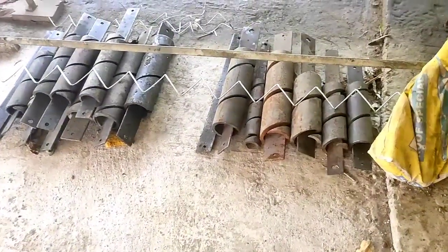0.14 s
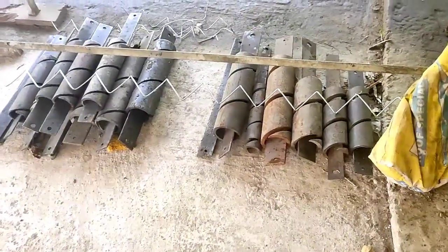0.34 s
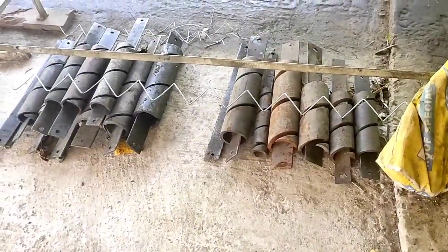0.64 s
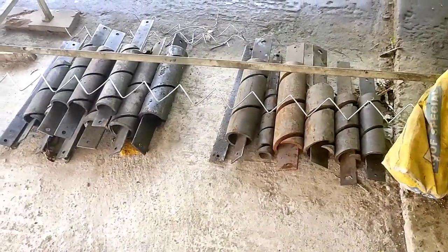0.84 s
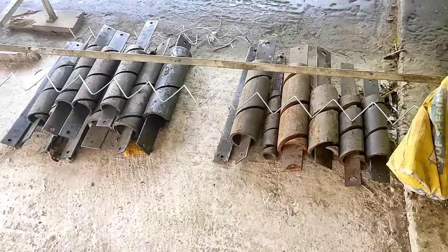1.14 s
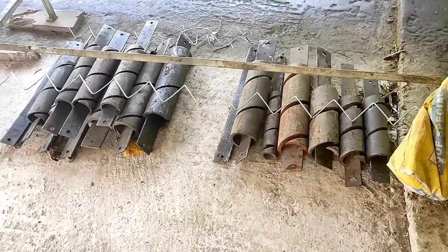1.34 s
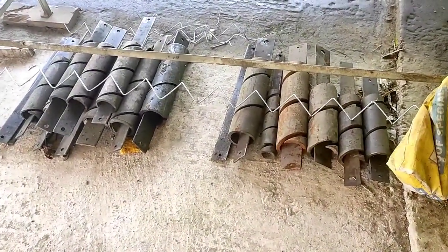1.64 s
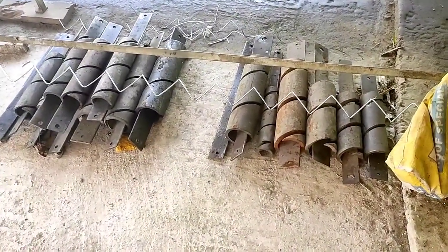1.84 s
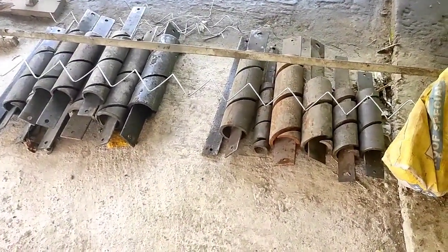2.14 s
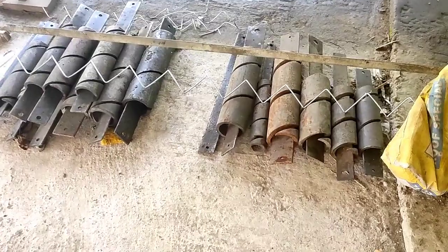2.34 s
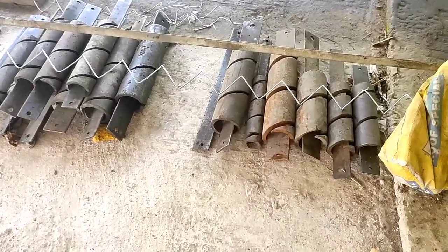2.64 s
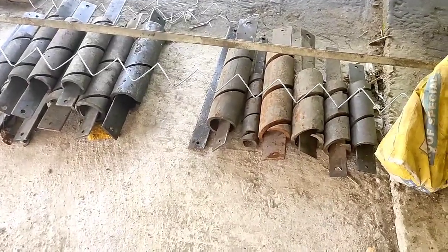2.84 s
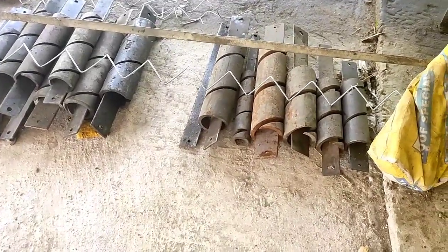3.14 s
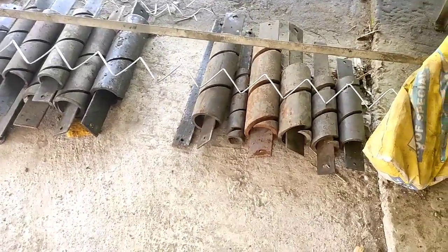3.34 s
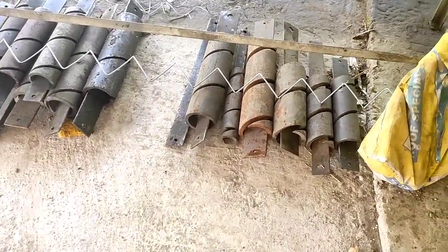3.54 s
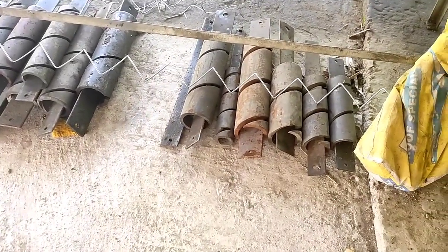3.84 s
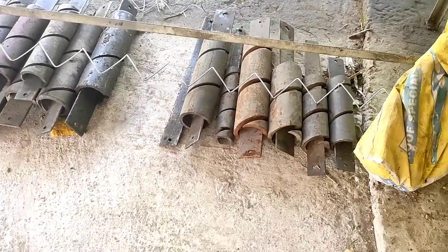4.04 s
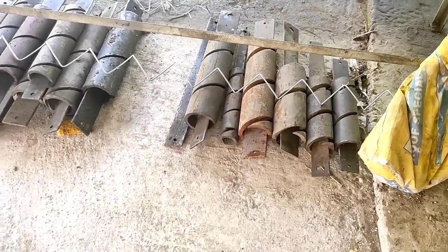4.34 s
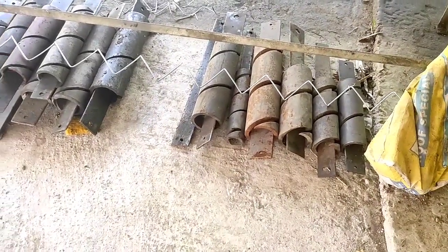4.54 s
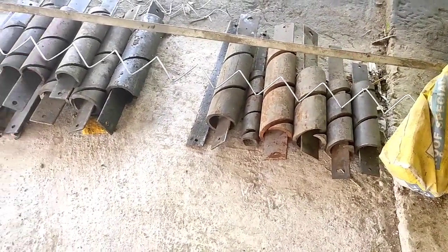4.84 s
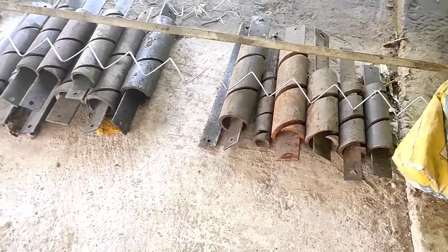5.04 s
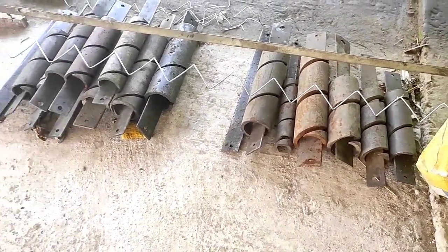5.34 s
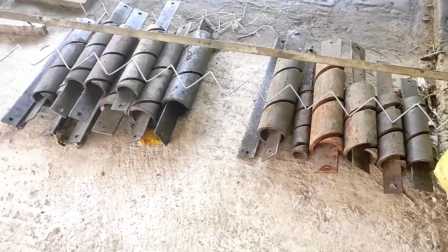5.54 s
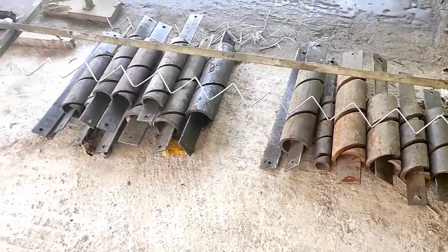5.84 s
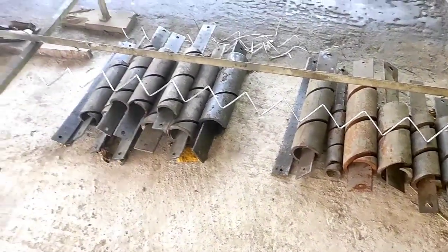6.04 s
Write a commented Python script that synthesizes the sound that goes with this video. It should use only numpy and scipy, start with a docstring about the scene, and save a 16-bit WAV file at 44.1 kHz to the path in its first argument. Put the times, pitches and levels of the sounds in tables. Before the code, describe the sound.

Quiet workshop idle, one cutter snap and sliding wire, then at two seconds a fence-weaving machine starts abruptly into dense, throbbing metallic rattle.

```python
"""A chain-link fence machine at work, close by, from beside its forming spirals in a hard-walled workshop.
At rest its motor idles, slack wire scrapes, mesh rustles and the cutter clacks; then the clutch takes hold.
Eight shaft turns a second drive harmonics of hum and random blows on frame and guides, each ringing
through its own spectrum. A plate sings, loose parts clang, the wire spiral rattles and whips in bursts.
A two-port microphone takes direct sound, early reflections and a diffuse tail."""
import sys
import numpy as np
from scipy import signal
from scipy.fft import rfft, irfft
from scipy.io import wavfile
from scipy.ndimage import uniform_filter1d, map_coordinates

SR = 44100
rng = np.random.default_rng(int(sys.argv[2]) if len(sys.argv) > 2 else 0)


def bounce(signal):
    """Save signal as a 16-bit WAV file at the path given by the first command-line argument."""
    frames = np.transpose(np.atleast_2d(signal))
    limited = np.clip(frames, -1, 1)
    pcm = np.round(limited * 32767).astype(np.int16)
    wavfile.write(sys.argv[1], SR, pcm)


N = 272979
T = np.arange(N) / SR  # time [s]

# Microphone: spacing of its ports, arrival lag at the left one [samples], upper limit
PORT_GAP_M, PORT_LAG, TOP_HZ = 0.18, 19, 14400

# Drive: shaft rate; the clutch starts to engage, its run-up, and the moment it takes hold
SHAFT_HZ = 8.015
ENGAGE_S, RUN_UP_S, BITE_S = 2.062, 0.055, 2.115
# Force through one turn, with two main strokes; each part takes its own share of the dB:
# (share of the turn [0-1], relative force [dB])
STROKE_FORCE = [(0, 2), (.15, -2), (.27, 3), (.42, 4), (.56, 1.5), (.72, -4), (.84, 9.5), (.95, 5.5)]
# Hum of the loaded drive: (multiple of the shaft rate, relative rms level [dB])
HUM_HARMONICS = [(1, -62), (3, -69), (4, -66), (6, -52.5), (13, -58), (15, -54), (16, -48), (18, -39.5),
                 (19, -41), (20, -48), (22, -40.5), (25, -39.5), (26, -32), (28, -37), (29, -37),
                 (30, -38.5), (31, -36.5), (38, -37.5), (42, -44), (50, -36.5), (52, -42), (54, -40.5),
                 (60, -48.5), (70, -49), (71, -39), (72, -40), (73, -42), (75, -34.5), (81, -41),
                 (83, -45.5), (85, -40)]
HUM_WAVER_DB = 2.14  # each harmonic's unsteadiness

# Spectrum of the steel frame: (frequency [Hz], relative level [dB])
FRAME_COLOUR = [(20, -16), (60, -26.5), (100, -18), (140, -4), (220, -9.5), (300, -2.5), (365, -7.5),
                (450, -8), (680, -2.5), (900, -11), (1400, -23), (3000, -48.5)]
# Resonances of the frame: (frequency [Hz], width [Hz], lift [dB])
FRAME_MODES = [(143.5, 13, -3.5), (204.3, 13, 11), (225, 16, 7.5), (418.3, 13, 7.5), (482, 18, 9.5),
               (568, 8.8, 10), (586, 46, 1), (650, 43, 3)]
# Borders between the panels' ranges: (frequency [Hz], ...)
FRAME_BANDS_HZ = (174, 277, 364, 536, 622)
# Heavy knocks, each booming one panel: (time [s], pitch [Hz], level [dB])
PANEL_KNOCKS = [(2.14, 150, -24.5), (2.222, 579, -18.5), (2.470, 581, -19.5), (2.514, 209.6, -20),
                (2.603, 435, -24), (3.066, 418, -20.5), (3.11, 248, -20), (3.126, 664, -18),
                (3.145, 420, -21), (3.476, 238, -21), (3.54, 565, -17), (3.781, 589, -17.5),
                (3.962, 575, -15), (4.011, 219, -22), (4.091, 213.4, -17), (4.214, 235.6, -21.5),
                (4.594, 255, -21), (4.718, 246, -21), (4.771, 478, -26), (4.787, 226, -18),
                (5.024, 664, -17.5), (5.212, 580, -18), (5.346, 205, -24), (5.51, 214, -18),
                (5.596, 248, -19), (5.718, 224, -21), (5.768, 593, -17), (5.847, 243, -18),
                (5.985, 473, -18)]
KNOCK_T60_S, KNOCK_OVERTONE, KNOCK_OVERTONE_DB = 0.21, 2.1, -5  # overtone: pitch ratio, relative level
CONTACT_S = 0.009  # how long a blow takes to set steel ringing

# Spectrum of the sheet-metal guides: (frequency [Hz], relative level [dB])
GUIDE_COLOUR = [(300, -12.5), (700, -1), (1000, -1.5), (1420, -4.5), (1700, 0), (2400, -4), (2800, -6),
                (3500, -11), (5500, -15.5), (14000, -31.5)]
# Resonances of the guides: (frequency [Hz], width [Hz], lift [dB])
GUIDE_MODES = [(1263, 82, 6.4), (1750, 42, 3.3), (2246, 35, 4.9), (2368, 49, 6), (2670, 81, 2.5),
               (3090, 76, 5.2), (3700, 31, 3.4)]
# Borders between ranges where the guides' colour shifts: (frequency [Hz], ...)
GUIDE_BANDS_HZ = (990, 1510, 2050, 2560)
GUIDE_WAVER_DB = 1.0  # how far it shifts
# A guide plate singing under the rubbing wire; positive pan is to the left
SING_HZ, SING_Q, SING_DB, SING_PAN_DB = 1243, 62, -34.5, -0.5

# Force on frame and guides in steady running (relative dB), and how far it wavers
FRAME_DB, GUIDES_DB, WAVER_DB = -26.5, -27.5, 0.39
# Taking up the load: extra force, and how fast it settles once the clutch holds
SURGE_DB, SURGE_S = 4.5, 0.089
# The wire snags or slips, and the drive labours or eases for a moment:
# (time of the peak [s], frame lift [dB], guides lift [dB])
SNAGS = [(2.49, 2, 3), (2.60, 3, -1), (3.06, 0.5, 2), (3.13, 4, -2), (3.29, 2, -4.5), (3.51, 2, 2),
         (3.78, 2.5, -4), (3.97, 2, 4), (4.10, -1, -0.5), (4.2, -1.5, 1.5), (4.48, 4.5, 1), (4.58, -3, 0),
         (4.8, 3.5, -2), (4.91, -1, 3), (5.2, 3.5, 1), (5.58, 0, 0), (5.69, -5, -1.5), (5.85, 3, 2)]
SNAG_S = 0.051  # half width of the swell

# Loose spirals clanging: (time [s], pitch [Hz], level [dB])
SPIRAL_CLANGS = [(2.068, 850, -31.5), (2.11, 1740, -23), (2.191, 1710, -29), (2.295, 1700, -26),
                 (2.325, 1730, -23), (2.411, 1187, -28), (2.435, 1730, -29), (2.54, 1184, -24),
                 (2.571, 1708, -23), (2.925, 1755, -25), (2.99, 1243, -23.5), (3.02, 1840, -31),
                 (3.04, 2120, -31), (3.065, 2330, -24), (3.227, 1243, -25), (4.168, 1767, -22),
                 (4.28, 2360, -23), (4.369, 1710, -27), (4.415, 1841, -25), (4.534, 1245, -27),
                 (4.54, 2380, -27), (4.56, 1960, -23), (4.575, 1606, -23.5), (4.7, 2310, -27),
                 (4.815, 2210, -31), (4.981, 1790, -31), (5.07, 1740, -30), (5.16, 1266, -26),
                 (5.564, 1787, -27), (5.995, 1757, -25)]
CLANG_Q, CLANG_ATTACK_S, CLANG_DECAY_S = 49, 0.0033, 0.05

# Spectrum of the thin wire: (frequency [Hz], relative level [dB])
WIRE_COLOUR = [(200, -15), (800, -2.5), (1800, 0.5), (3200, 3), (4500, 1.5), (5800, -0.5), (7100, 3),
               (8700, -1.5), (11000, -2), (14000, -4)]
# Borders between ranges where the wire's colour shifts: (frequency [Hz], ...)
WIRE_BANDS_HZ = (3000, 5560, 8600, 11300)
WIRE_WAVER_DB = 0.53  # how far it shifts
SIZZLE_DB, WIRE_THROB = -40, 0.64  # underlying ticking (relative); share of the stroke's dB reaching the wire
# Bursts of wire shaking against mesh and spirals: (time [s], relative level [dB], length [s])
SHAKES = [(2.452, -29.5, 0.029), (2.622, -31, 0.082), (2.82, -32, 0.11), (2.96, -31.5, 0.19),
          (3.201, -26.5, 0.034), (3.327, -29.5, 0.1), (3.454, -27.5, 0.04), (3.626, -27, 0.06),
          (3.823, -26, 0.069), (4.01, -26.5, 0.061), (4.135, -25, 0.028), (4.306, -26, 0.12),
          (4.408, -24, 0.027), (4.527, -23, 0.062), (4.649, -25, 0.012), (4.764, -24, 0.078),
          (4.979, -25.5, 0.1), (5.12, -28, 0.065), (5.268, -25, 0.078), (5.383, -28.5, 0.057),
          (5.509, -24, 0.07), (5.68, -25.5, 0.14), (5.894, -26, 0.09), (5.972, -27.5, 0.08),
          (6.07, -27, 0.11)]
SHAKE_ATTACK_S, SHAKE_RELEASE_S = 0.008, 0.022
# Each burst also shakes guides and frame (dB relative to the burst); slack wire passes on a limited force
SHAKE_TO_GUIDES_DB, SHAKE_TO_FRAME_DB, SHAKE_LIMIT_DB = 2, -11, -23
# The wire's end whipping the steel: (time [s], centre of the ring [Hz], level [dB], decay [s])
WIRE_WHIPS = [(2.648, 6900, -32, .04), (3.213, 12200, -33, .03), (3.505, 11800, -34, .03),
              (3.66, 11000, -32, 0.036), (3.838, 5350, -33, .025), (3.965, 12500, -33, .03),
              (4.146, 4190, -31, .02), (4.403, 13400, -27, 0.04), (4.532, 10800, -33, .025),
              (4.585, 12000, -26, 0.033), (4.772, 12900, -24, 0.02), (4.845, 12000, -27, 0.033),
              (5.024, 7030, -30, 0.031), (5.03, 11000, -30, .03), (5.29, 7100, -31, .03),
              (5.526, 8700, -29, .025), (5.54, 12500, -27, .03), (6.04, 11700, -38, .035)]
WHIP_Q = 5.1

# Clacks of the cutter and the clutch: (time [s], relative level [dB], chatter decay [s])
STEEL_CLACKS = [(1.398, -23, 0.027), (1.422, -28.5, 0.02), (1.449, -30.5, 0.045), (1.512, -37, 0.033),
                (1.572, -42, 0.028), (1.632, -46, .025), (2.064, -25, 0.062), (2.093, -21, 0.021)]
# Spectrum of the clacks: (frequency [Hz], relative level [dB])
CLACK_COLOUR = [(50, -29), (110, -9), (150, -4.5), (210, -4.5), (330, -15), (440, -9), (760, -7),
                (1350, -4), (1560, -3.5), (2100, -6), (2700, -6), (4000, -8), (14000, -16.5)]
# Ring of the cutter's steel: (frequency [Hz], width [Hz], lift [dB])
CLACK_MODES = [(1060, 54, 2), (1580, 36, 7), (1630, 25, 8), (1860, 25, 8), (1990, 25, 9), (2400, 30, 7),
               (3050, 32, 9), (3240, 25, 8), (3460, 27, 0)]
# Ring of the clutch housing as the drive takes hold: (frequency [Hz], starting rms level [dB], t60 [s])
HOUSING_MODES = [(573, -13.5, 0.31), (598, -23, 0.25), (708, -19, 0.24), (873, -20.5, 0.26),
                 (1270, -28, 0.35), (1790, -30, 0.18), (2210, -25, 0.38), (2400, -30, 0.25),
                 (2821, -31, .3), (3070, -31, .18)]

# Wire sliding through the guides while the drive rests:
# (time [s], relative level [dB], length [s], fade [s], metallic ring [0-1])
SCRAPES = [(-.02, -46, 0.21, .085, 0.5), (0.436, -55, 0.043, 0.055, 0), (0.66, -54, 0.35, .06, 0),
           (1.092, -45.5, 0.069, 0.076, 0.6), (1.284, -48, 0.11, .06, 0.1),
           (1.544, -37.5, 0.036, 0.19, 0.8), (1.698, -44, 0.11, .06, 0.66)]
SCRAPE_ATTACK_S = 0.01
# Spectrum of the scraping: (frequency [Hz], relative level [dB])
SLIDE_COLOUR = [(400, 3.5), (1500, -11), (3200, 3), (5500, 0), (7000, 6.5), (9000, 4), (12000, 4.5),
                (14500, -1.5)]

# Nudges of the hanging mesh while the drive rests: (time [s], level [dB])
NUDGES = [(-.09, -46), (.67, -47.5), (1.48, -38.5), (1.85, -47)]
NUDGE_ATTACK_S, NUDGE_HOLD_S, NUDGE_DECAY_S = 0.039, 0.077, 0.093
MESH_REST_DB = -63  # its faint stirring in between
# Spectrum of the mesh: (frequency [Hz], relative level [dB])
MESH_COLOUR = [(250, -10.5), (700, 3), (1000, 0.5), (1400, -0.5), (2300, -3), (3300, -6.5), (5500, -13),
               (14000, -45)]

# A steel part left ringing: (frequency [Hz], starting rms level [dB], t60 [s])
PING_MODES = [(2670, -47, 0.33), (2745, -51, 0.25)]

# Spectrum of the idling motor: (frequency [Hz], relative level [dB])
IDLE_COLOUR = [(12, -45), (32, 1), (130, -1.5), (250, -5), (350, -9), (490, -18), (620, -9.5), (820, -11.5),
               (1150, -10), (1400, -13), (2060, -13), (3860, -22), (8000, -24), (14000, -31)]
# Resonance of the motor: (frequency [Hz], width [Hz], lift [dB])
IDLE_MODE = [(623, 25, 9.4)]
IDLE_DB = -48.5  # rumble, about which it wavers
# Steady lines of the motor: (frequency [Hz], rms level about which it wavers [dB])
IDLE_LINES = [(100, -62.5), (178, -61), (209, -61), (399, -72)]


def hum(turns, engaged, stroke_db):
    """Shaft harmonics, each wavering as the load shifts; they throb with the strokes."""
    out = np.zeros((2, N))
    # the left port lags by half the direct sound's delay, so it hears an earlier turn
    ports = turns - np.array([[PORT_LAG / 2], [0]]) * SHAFT_HZ / SR
    for order, db in HUM_HARMONICS:
        phase = 2 * np.pi * (round(order) * ports + rng.random()) + 0.19 * walk(6)
        out += undb(db + HUM_WAVER_DB * walk(7)) * np.sqrt(2) * np.sin(phase)
    return out * engaged * undb(-2.5 + 0.44 * stroke_db)


def frame(force):
    """Play in the bearings knocks the frame, hardest on each stroke; its panels flex and boom unevenly."""
    jolts = impacts(900, 2.05) * force * load(FRAME_DB, SHAKE_TO_FRAME_DB, column=1)
    boom = workshop(jolts, FRAME_COLOUR, FRAME_MODES, wet_db=-5.0, t60=0.3, early_db=-22, pan_db=1.6)
    flexing = flex(undb(-1.15) * boom, drift_ms=.2, rate=8)
    return shimmer(flexing, FRAME_BANDS_HZ, .9, rate=14)


def knocks():
    """A blow makes a panel boom with one inharmonic overtone."""
    out = np.zeros((2, N))
    for s, hz, db in PANEL_KNOCKS:
        boom = (hz, db, KNOCK_T60_S)
        overtone = (hz * KNOCK_OVERTONE, db + KNOCK_OVERTONE_DB, KNOCK_T60_S / 2)
        out += struck(s, [boom, overtone])
    return out


def guides(force):
    """The spinning wire beats its guides, which flex as they ring."""
    beats = impacts(650, 3.0) * force * load(GUIDES_DB, SHAKE_TO_GUIDES_DB, column=2)
    clatter = workshop(beats, GUIDE_COLOUR, GUIDE_MODES, wet_db=8.0, t60=0.74, early_db=2.0, pan_db=-2.5)
    return shimmer(flex(clatter, drift_ms=.35, rate=10), GUIDE_BANDS_HZ, GUIDE_WAVER_DB, rate=14)


def sing(force):
    """The wire rubs a guide plate into a rough note that wavers in pitch and strength."""
    note = unit(signal.lfilter(*signal.iirpeak(SING_HZ, SING_Q, SR), diffuse(N)))
    level = undb(SING_DB + 2 * walk(7))
    return flex(note, drift_ms=0.16, rate=12) * force * level * pan(SING_PAN_DB)


def clangs():
    """Each loose part chatters briefly against its neighbours and rings at its own pitch."""
    t = T[:SR // 2]
    chatter = np.clip(t / CLANG_ATTACK_S, 0, 1) * np.exp(-t / CLANG_DECAY_S)
    out = np.zeros((2, N))
    for s, hz, db in SPIRAL_CLANGS:
        add_burst(out, s, diffuse(len(t)) * chatter, chatter, hz, CLANG_Q, db)
    return out


def wire(force):
    """Bursts of tiny wire-on-wire ticks over an underlying sizzle, shifting in colour as the spiral turns."""
    ticks = impacts(2000, 5.8) * np.sqrt((undb(SIZZLE_DB) * force) ** 2 + shaking())
    rattle = workshop(ticks, WIRE_COLOUR, (), wet_db=12.5, t60=0.65, early_db=11.5, pan_db=-0.5)
    flexing = flex(undb(2.0) * rattle, drift_ms=.4, rate=9)
    return shimmer(flexing, WIRE_BANDS_HZ, WIRE_WAVER_DB, rate=16)


def whips():
    """The wire's end strikes a sharp spray of ticks, each with its own colour."""
    t = T[:SR // 4]
    out = np.zeros((2, N))
    for s, hz, db, decay in WIRE_WHIPS:
        fade = np.exp(-t / decay)
        ticks = diffuse(len(t)) * fade * undb(2.1 * walk(900, size=len(t)))
        add_burst(out, s, ticks, fade, hz, WHIP_Q, db)
    return out


def clacks():
    """Steel snaps shut and chatters to rest; the workshop rings on."""
    force = np.zeros(N)
    for s, db, decay in STEEL_CLACKS:
        force += undb(db) * (T >= s) * np.exp(-np.maximum(T - s, 0) / decay)
    blows = impacts(1400, 2.2) * force
    ringing = workshop(blows, CLACK_COLOUR, CLACK_MODES, wet_db=4.0, t60=0.27, early_db=-6.0, pan_db=-1.0)
    return undb(1.0) * ringing


def clutch_housing():
    """The housing's steel modes ring as the drive takes hold."""
    return struck(BITE_S, HOUSING_MODES)


def slide(round_trip_hz=236):
    """Scraping hiss runs to and fro in the wire and takes on a thin metallic ring."""
    pulls = np.array([undb(db) * stroke(s, SCRAPE_ATTACK_S, length, fade)
                      for s, db, length, fade, _ in SCRAPES])
    scrape = impacts(6000, 3.0) * pulls.max(axis=0) * undb(walk(24.5))
    # the strongest scrape sets how much comes back from each trip
    echo = np.clip(np.array(SCRAPES)[pulls.argmax(axis=0), 4], 0, .8)
    hiss = workshop(scrape, SLIDE_COLOUR, (), wet_db=7, t60=.12, early_db=0, pan_db=0)
    lag = int(SR / round_trip_hz)
    trips = sum(echo ** k * np.pad(hiss, ((0, 0), (k * lag, 0)))[:, :N] for k in range(5))
    return np.sqrt(1 - echo ** 2) * trips


def mesh():
    """While the drive rests the hanging mesh sways and rustles softly."""
    sway = undb(MESH_REST_DB) * np.ones(N)
    for s, db in NUDGES:
        sway += undb(db) * stroke(s, NUDGE_ATTACK_S, NUDGE_HOLD_S, NUDGE_DECAY_S)
    stir = impacts(900, 5.4) * sway * (T < ENGAGE_S)
    return workshop(stir, MESH_COLOUR, (), wet_db=-2.5, t60=0.77, early_db=-0.5, pan_db=-3.5)


def ping():
    """Two steel modes ring and die away at the opening."""
    return struck(0, PING_MODES)


def motor():
    """The motor idles throughout: soft rumble and a few lines that waver."""
    rumble = unit(np.array([ring(port, IDLE_COLOUR, IDLE_MODE) for port in diffuse(N)]))
    rumble *= undb(IDLE_DB + 0.95 * walk(11.5))
    lines = np.zeros(N)
    for hz, db in IDLE_LINES:
        level = undb(db + 3.2 * walk(10))
        lines += level * np.sqrt(2) * np.sin(2 * np.pi * hz * T + .65 * walk(10))
    return flex(rumble, drift_ms=.6, rate=8) + lines


def load(steady_db, shake_db, column):
    """Force on one part: steady running plus the wire's bursts, with a starting surge and shifts at snags."""
    surge = SURGE_DB * np.exp(-np.maximum(T - BITE_S, 0) / SURGE_S)
    passed_on = np.minimum(shaking(), undb(2 * SHAKE_LIMIT_DB))
    snags = sum(row[column] * np.exp(-((T - row[0]) / SNAG_S) ** 2) for row in SNAGS)
    power = undb(2 * steady_db) + undb(2 * shake_db) * passed_on
    return np.sqrt(power) * undb(surge + snags + WAVER_DB * walk(14))


def shaking():
    """Power of the wire's bursts: each starts sharply, holds and stops."""
    power = np.zeros(N)
    for s, db, length in SHAKES:
        rise = np.clip((T - s) / SHAKE_ATTACK_S, 0, 1)
        power += undb(2 * db) * rise * np.clip(1 - (T - s - length) / SHAKE_RELEASE_S, 0, 1)
    return power


def stroke(s, attack, length, decay):
    """Envelope of one movement: rise, hold until its length is up, die away."""
    return np.clip((T - s) / attack, 0, 1) * np.exp(-np.maximum(T - s - length, 0) / decay)


def struck(s, modes):
    """Steel modes swell over a few milliseconds of contact and die away; the left port hears them later."""
    start = max(int(s * SR), 0)
    t = T[:min(SR // 2, N - start)]
    port_t = t - np.array([[PORT_LAG], [0]]) / SR
    out = np.zeros((2, N))
    for hz, db, t60 in modes:
        jitter = 0.36 * walk(42, size=len(t))  # unsteady contact
        phase = 2 * np.pi * (hz * port_t + rng.random()) + jitter
        level = np.sqrt(2) * undb(db - 60 * t / t60) * np.clip(t / CONTACT_S, 0, 1)
        out[:, start:start + len(t)] += level * np.sin(phase)
    return out


def add_burst(out, s, noise, envelope, hz, q, db):
    """Ring a noise burst at one resonance, level it against its envelope and add it at s seconds."""
    tone = signal.lfilter(*signal.iirpeak(hz, q, SR), noise)
    tone *= undb(db) * np.sqrt(np.mean(envelope ** 2) / np.mean(tone ** 2))
    start = int(s * SR)
    out[:, start:start + tone.shape[1]] += tone[:, :N - start]


def flex(x, drift_ms, rate):
    """A wandering delay slides the resonances up and down a little, as in steel bending under load."""
    where = (T + drift_ms / 1000 * walk(rate)) * SR
    return np.array([map_coordinates(port, [where], order=3, mode="nearest") for port in x])


def shimmer(x, edges_hz, depth_db, rate):
    """The point of contact wanders, so each band of a ringing part swells and fades by itself."""
    spectrum = rfft(x)
    band = np.searchsorted(np.sort(edges_hz), np.fft.rfftfreq(N, 1 / SR))
    return sum(irfft(spectrum * (band == k), N) * undb(depth_db * walk(rate))
               for k in range(len(edges_hz) + 1))


def workshop(x, colour, modes, wet_db, t60, early_db, pan_db):
    """A body shaken by x, heard in the room: direct sound (right port first), reflections, diffuse tail."""
    t = T[:SR // 10]
    paths = diffuse(len(t)) * undb(-60 * t / .09)  # early reflections, gone in 90 ms
    paths *= undb(early_db) / np.sqrt(np.sum(paths ** 2) / 2)
    paths[0, PORT_LAG] += 1
    paths[1, 0] += 1
    near = signal.fftconvolve(x[None], paths, axes=1)[:, :N]
    # the room stores the energy of each blow and lets it leak away
    keep = np.exp(-2 * np.log(1000) / (t60 * SR))
    stored = signal.lfilter([1 - keep], [1, -keep], x ** 2)
    tail = undb(wet_db) * unit(diffuse(N)) * np.sqrt(stored)
    ports = (near + tail) / np.sqrt(1 + undb(2 * wet_db) + undb(2 * early_db))
    return np.array([ring(port, colour, modes) for port in ports]) * pan(pan_db)


def ring(x, colour, modes=()):
    """Pass x through a body's spectrum and resonances: a causal minimum-phase response of unit energy."""
    size = 16384
    f = np.maximum(np.fft.rfftfreq(size, 1 / SR), 1)
    hz, db = np.transpose(colour)
    db = np.interp(np.log(f), np.log(hz), db)
    for centre, width, lift in modes:
        db = db + lift / (1 + (2 * (f - centre) / width) ** 2)
    # folding the cepstrum forward makes the response causal
    cepstrum = irfft(np.log(undb(db)))
    cepstrum[1:size // 2] *= 2
    cepstrum[size // 2 + 1:] = 0
    response = irfft(np.exp(rfft(cepstrum)))
    return signal.fftconvolve(x, response / np.linalg.norm(response))[:N]


def diffuse(size):
    """Noise from all sides at two microphone ports: alike in the bass, nearly unrelated in the treble."""
    likeness = np.sinc(2 * np.fft.rfftfreq(size, 1 / SR) * PORT_GAP_M / 343)  # speed of sound 343 m/s
    mid, side = rfft(rng.standard_normal((2, size))) * np.sqrt([1 + likeness, 1 - likeness])
    return irfft([mid + side, mid - side], size)


def pan(db):
    """Gains of the left and right port, this many dB apart."""
    return undb(np.array([[db], [-db]]) / 2)


def impacts(rate, spread_db):
    """Random contacts, about so many a second, of uneven size and either sign; rms 1."""
    sizes = undb(spread_db * np.clip(rng.standard_normal(N), -2, 2)) * rng.choice([-1, 1], N)
    return unit(sizes * (rng.random(N) < rate / SR))


def walk(rate, size=N):
    """Chance: random levels, so many a second, smoothed twice and scaled near rms 1."""
    k = int(SR / rate)
    steps = np.repeat(rng.standard_normal(size // k + 1), k)
    return unit(uniform_filter1d(uniform_filter1d(steps, k), k)[:size])


def unit(x):
    """Scale to rms 1."""
    return x / np.sqrt(np.mean(x ** 2))


def undb(db):
    """Decibels to gain."""
    return 10 ** (np.asarray(db) / 20)


def scene():
    """One shaft drives hum, knocks, clatter and sizzle once the clutch is in."""
    turns = np.cumsum(SHAFT_HZ * (1 + 0.00087 * walk(3.06))) / SR
    engaged = np.clip((T - ENGAGE_S) / RUN_UP_S, 0, 1) ** 2
    # the heavy frame needs a moment longer to get going
    swinging = engaged * (1 - np.exp(-np.maximum(T - ENGAGE_S, 0) / 0.067))
    stroke_db = np.interp(turns - .01, *np.transpose(STROKE_FORCE), period=1)
    heavy = swinging * undb(0.59 * stroke_db)
    light = engaged * undb(0.63 * stroke_db)
    on_wire = engaged * undb(WIRE_THROB * stroke_db + 1.3)
    body = hum(turns, swinging, stroke_db) + frame(heavy) + knocks()
    metalwork = guides(light) + sing(engaged) + clangs()
    spiral = wire(on_wire) + whips()
    resting = slide() + mesh() + ping()
    return body + metalwork + spiral + clacks() + clutch_housing() + resting + motor()


def record(dry):
    """The loudest peaks are softly rounded, and the phone cuts the top."""
    rounded = dry / (1 + (dry / .75) ** 4) ** .25
    return signal.sosfilt(signal.ellip(10, .1, 80, TOP_HZ, fs=SR, output="sos"), rounded)


dry = scene()
out = record(dry)
bounce(out)
```